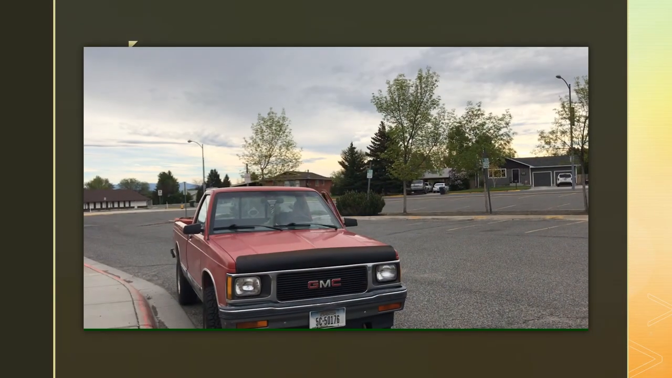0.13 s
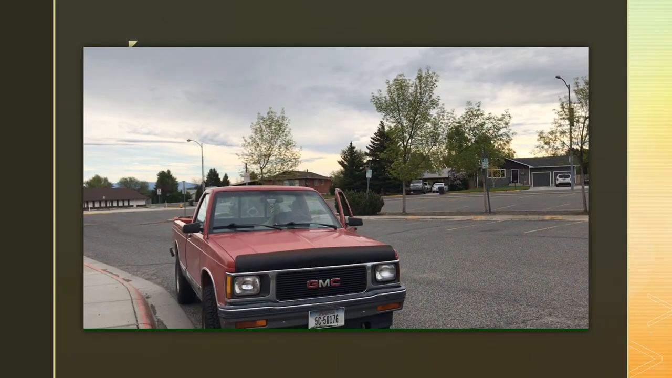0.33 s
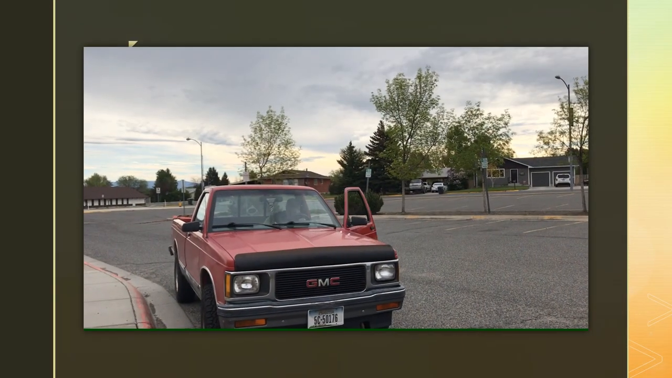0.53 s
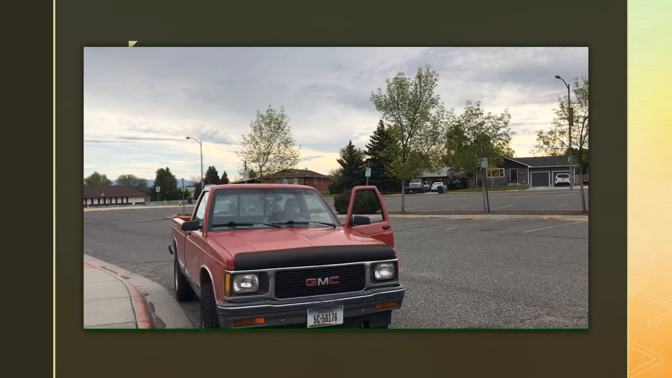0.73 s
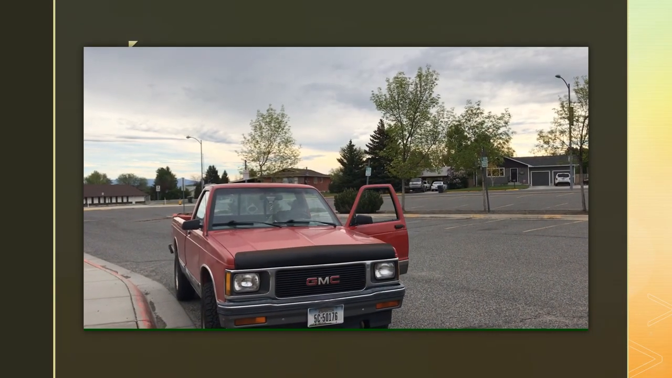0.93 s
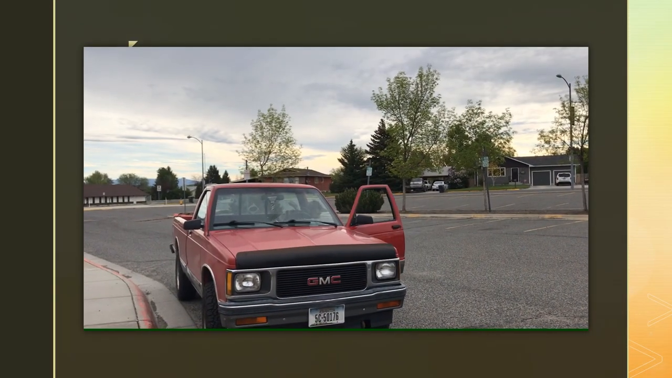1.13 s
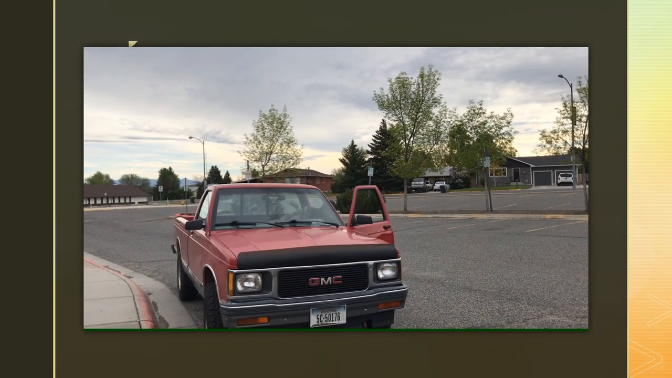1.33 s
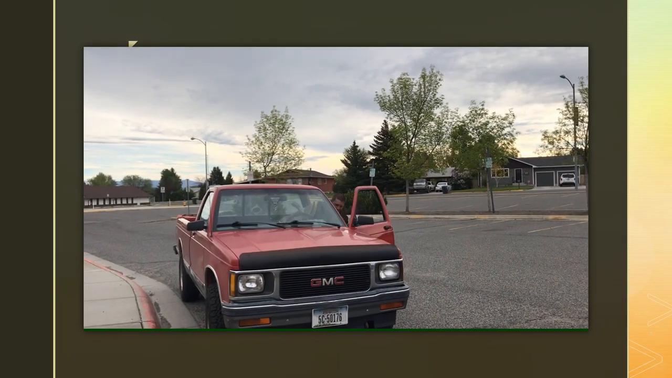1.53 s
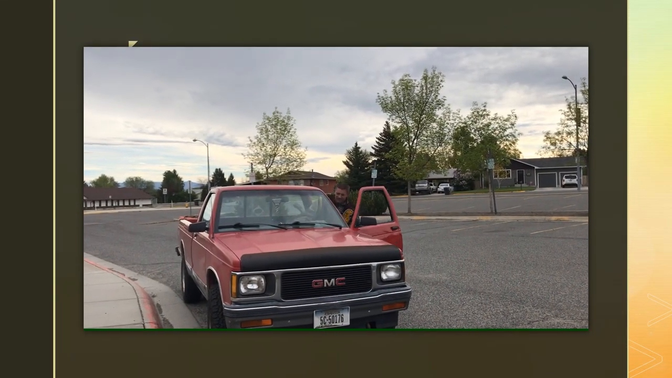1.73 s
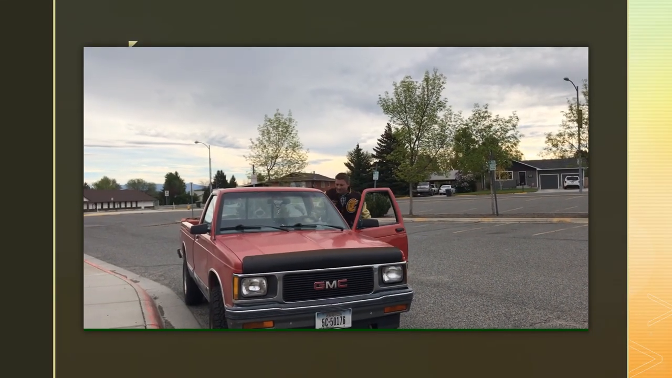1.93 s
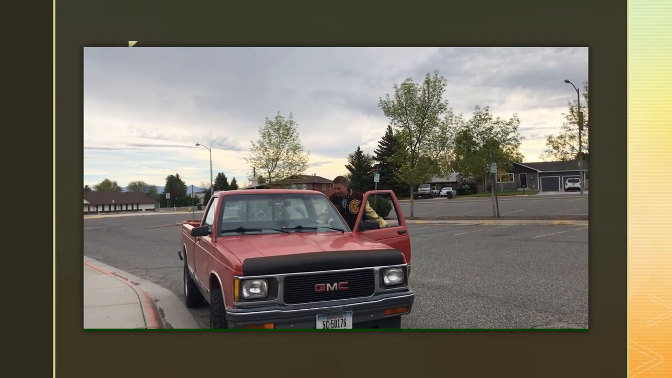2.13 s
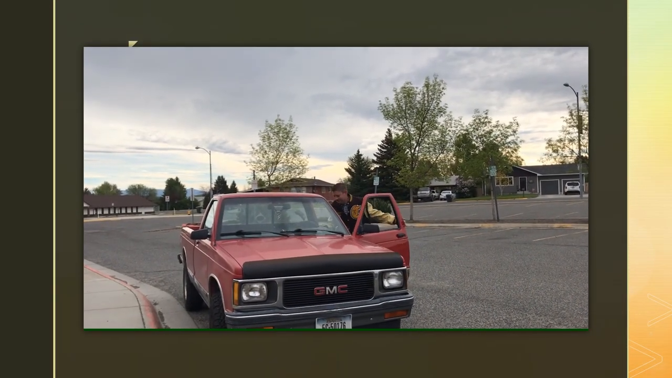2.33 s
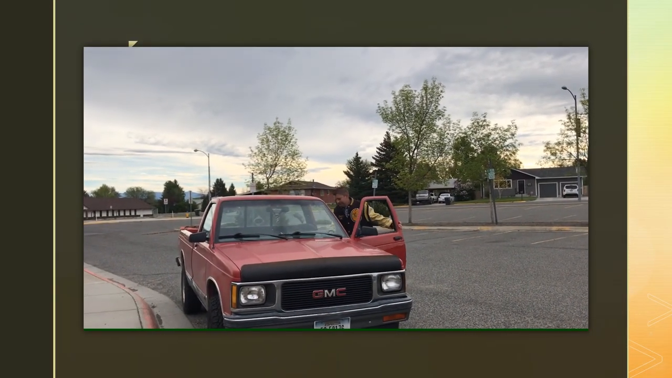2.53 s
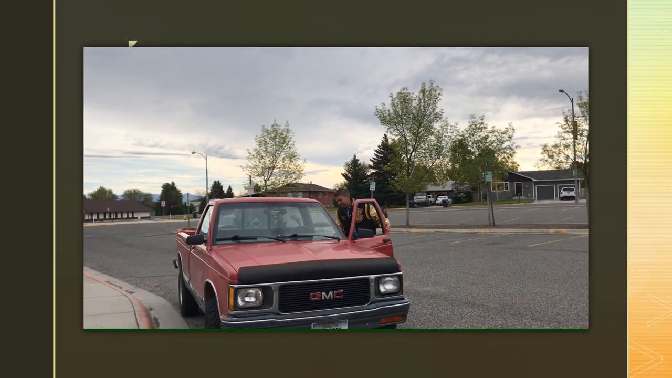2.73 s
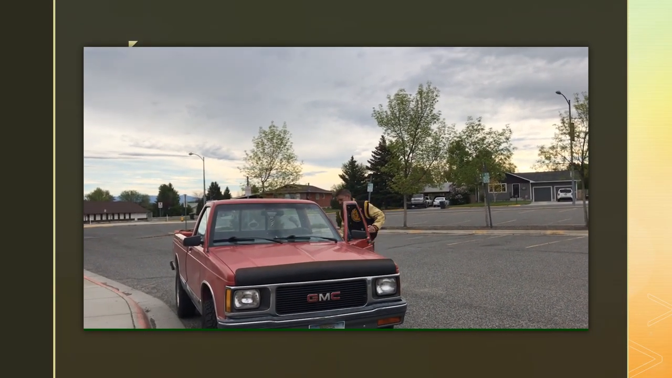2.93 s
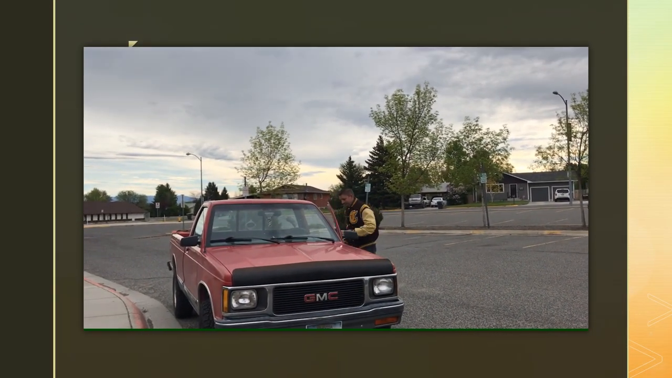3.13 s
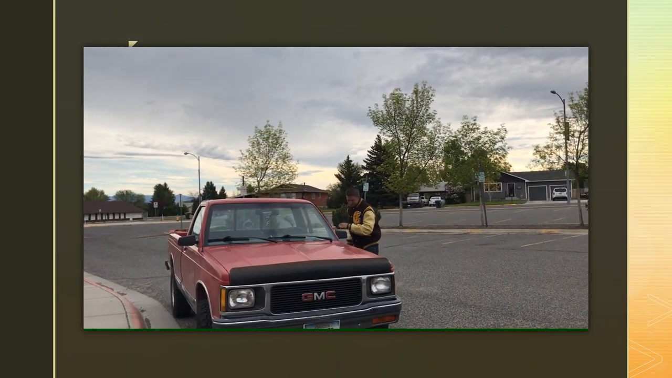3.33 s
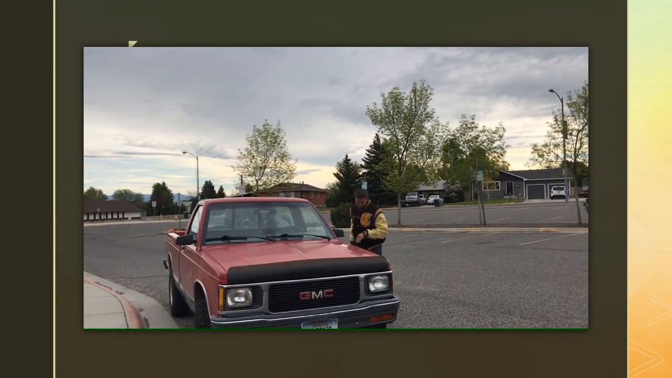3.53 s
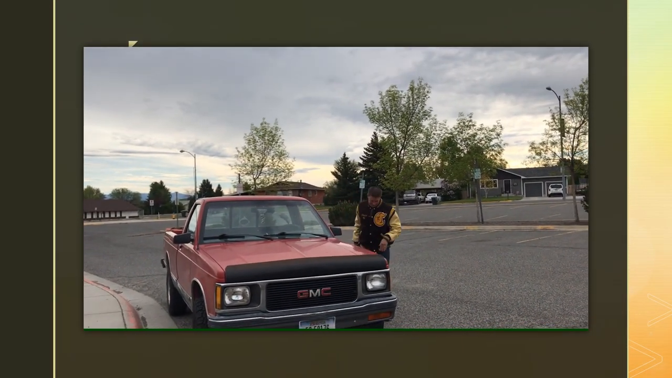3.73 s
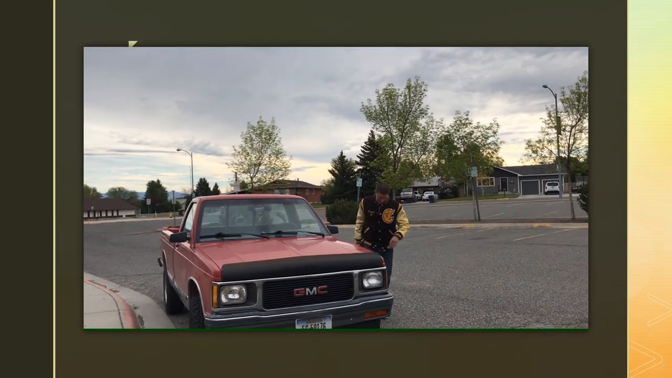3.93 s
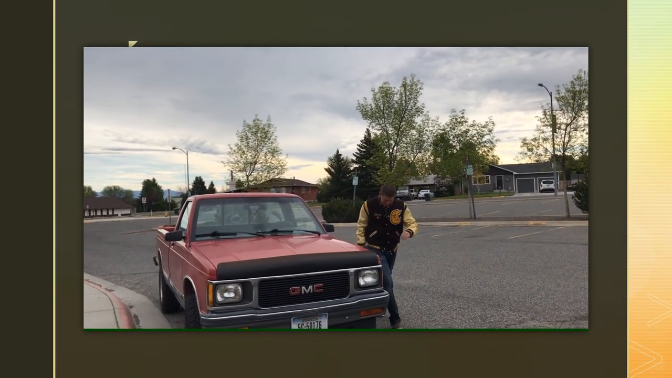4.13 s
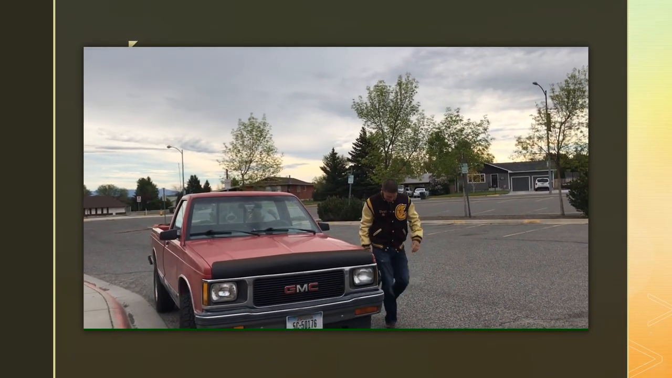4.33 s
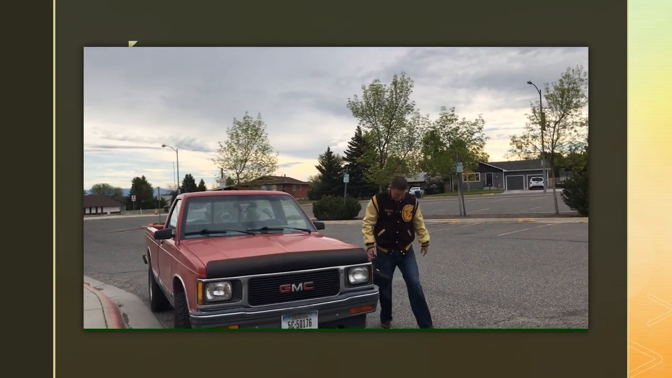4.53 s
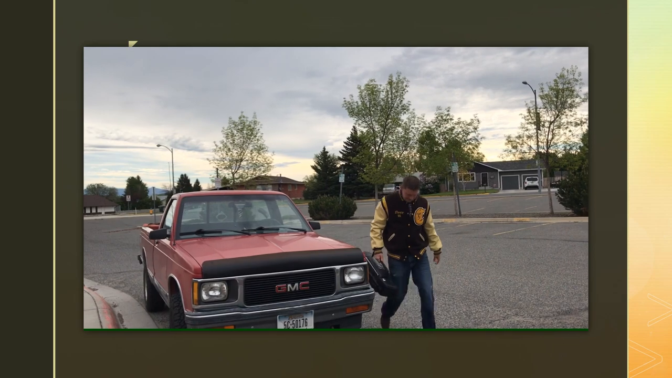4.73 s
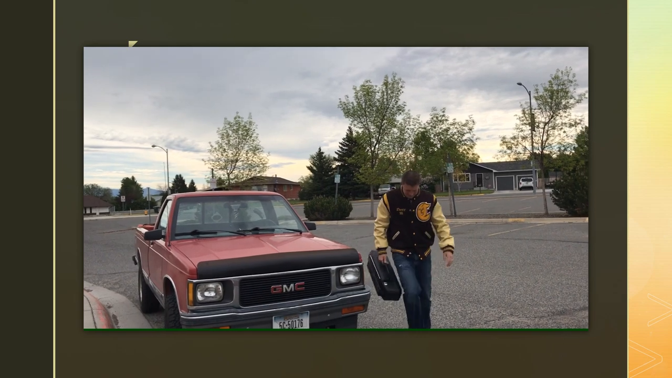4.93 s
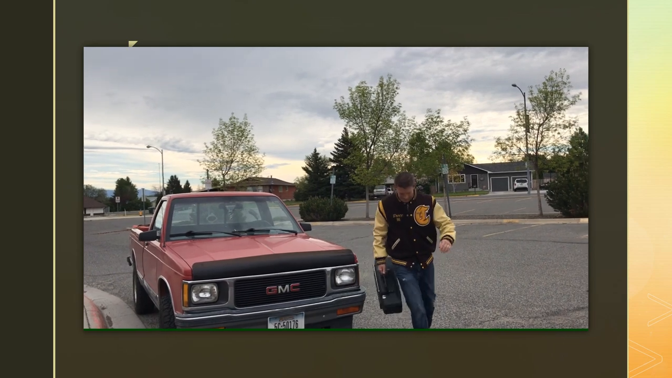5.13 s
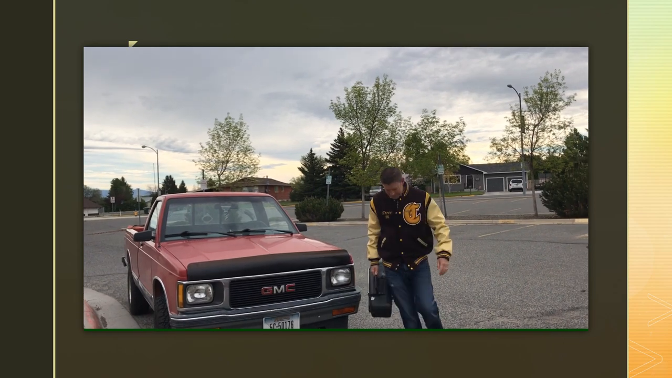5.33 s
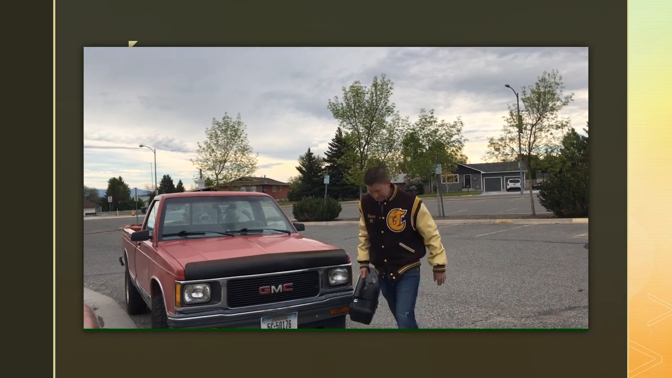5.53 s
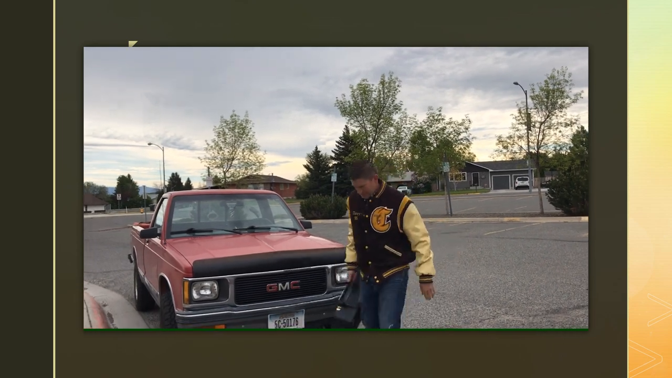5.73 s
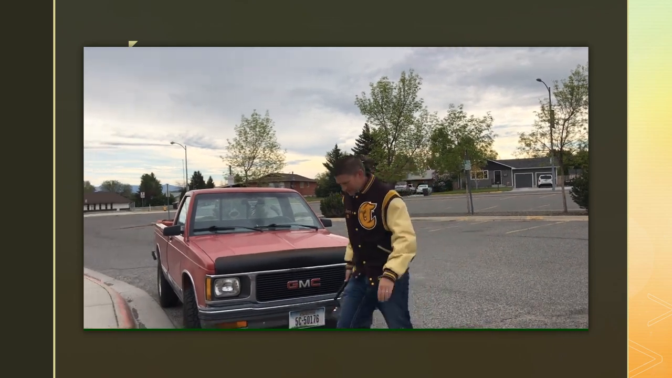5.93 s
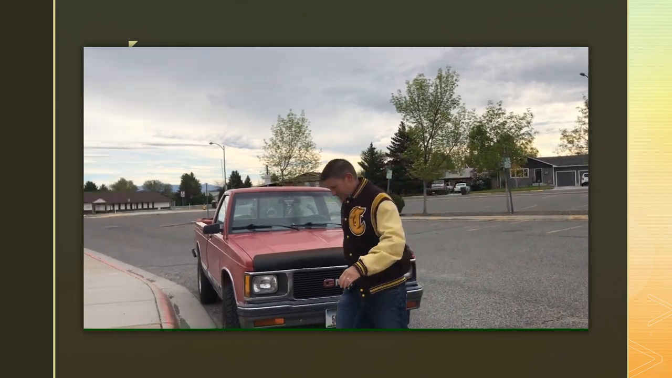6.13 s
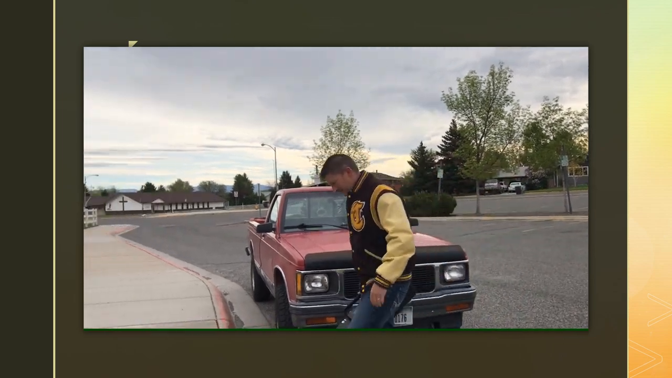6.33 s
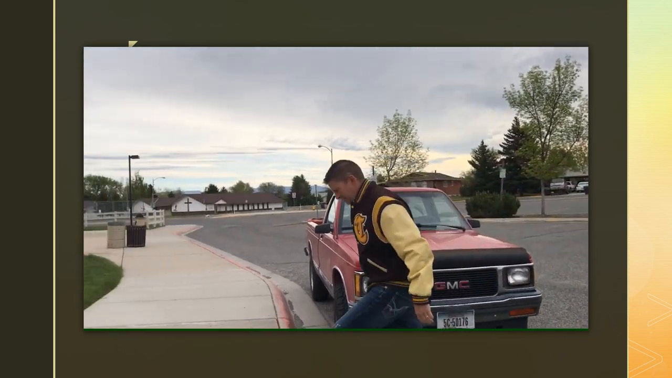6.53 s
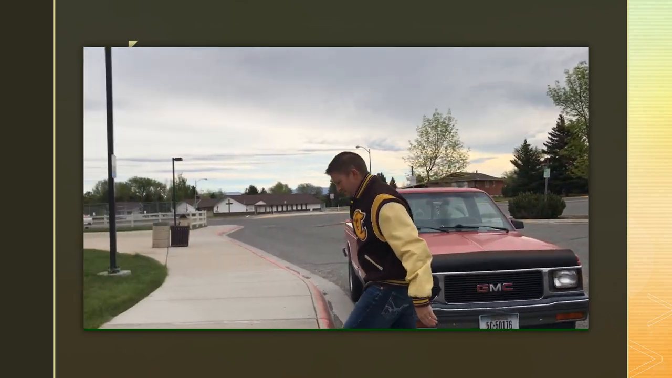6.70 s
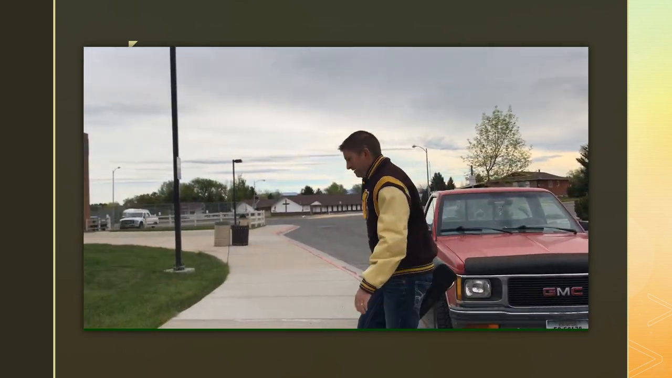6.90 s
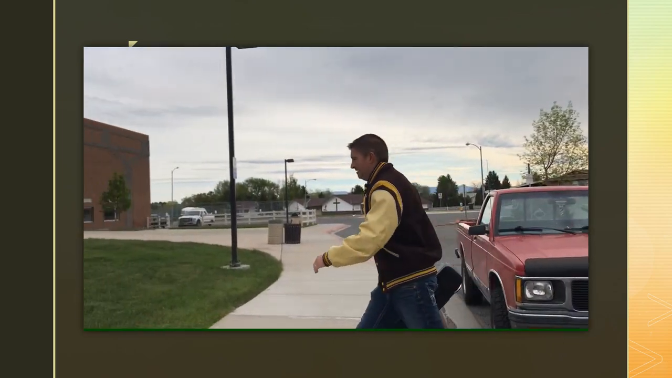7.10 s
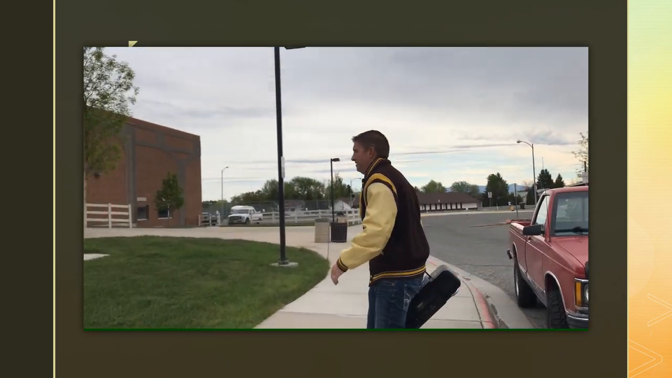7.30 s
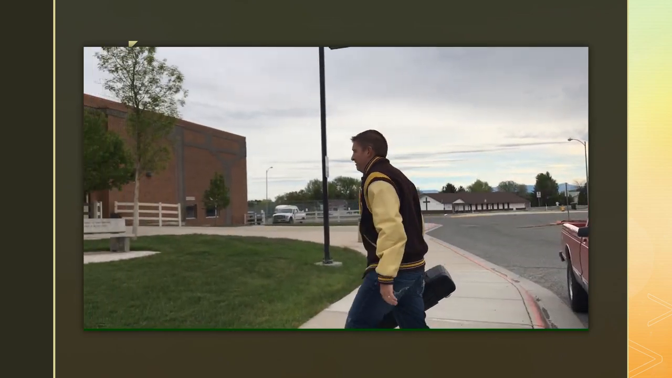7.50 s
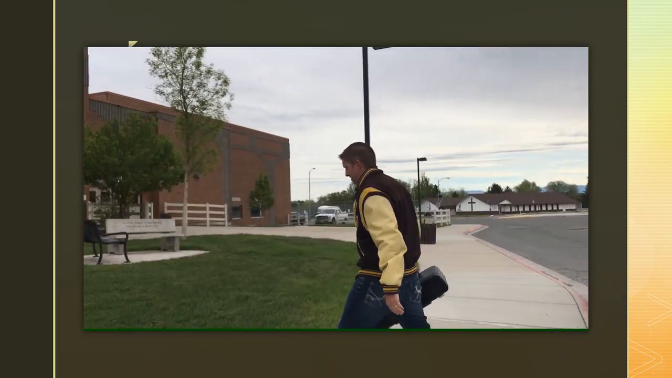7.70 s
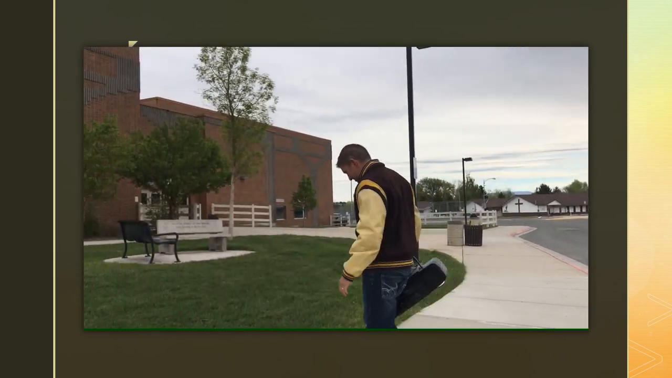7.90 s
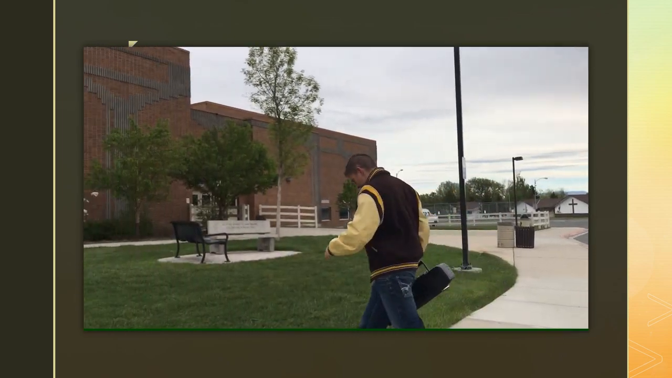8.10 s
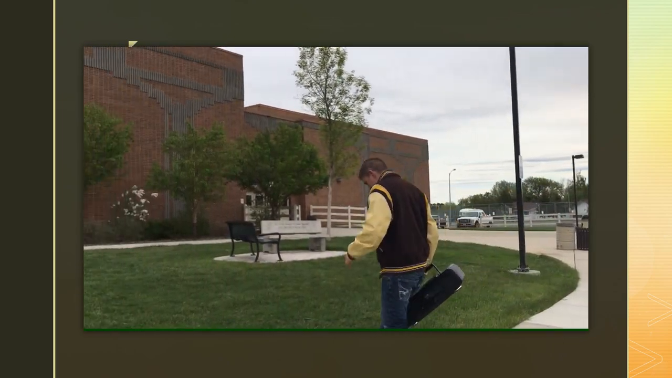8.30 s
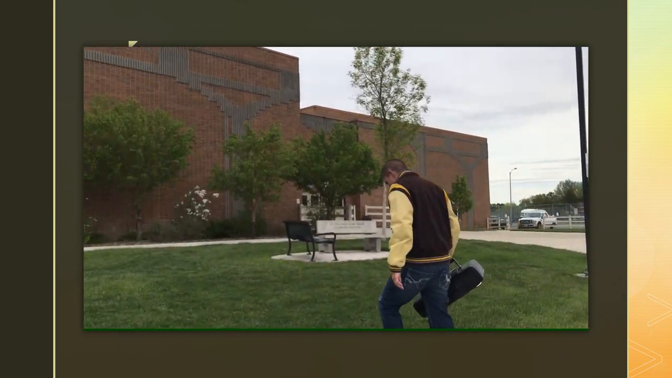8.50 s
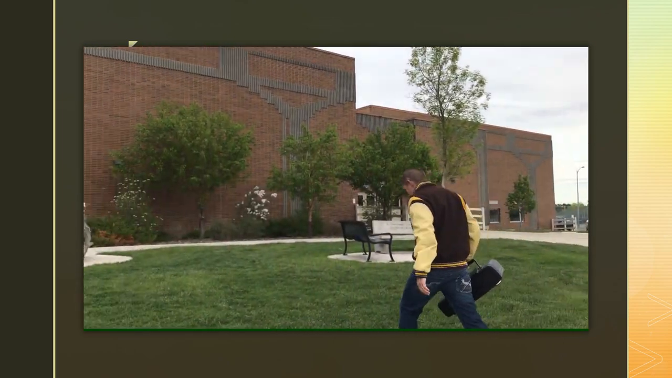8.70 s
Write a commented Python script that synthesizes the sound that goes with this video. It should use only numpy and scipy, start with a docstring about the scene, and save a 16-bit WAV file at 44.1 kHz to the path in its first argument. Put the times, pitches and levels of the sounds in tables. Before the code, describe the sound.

Faint bumps in a truck cab, one loud door slam, then quiet gritty footsteps moving onto grass over distant traffic and engine hum.

```python
"""An open parking lot, one microphone near a pickup. The driver climbs out and slams the door: latch and
frame strike, the steel panel clangs, the cab booms and houses throw the bang back. Footsteps pass
over gritty asphalt and onto a lawn, where blades hiss against the shoes. Further off an engine idles
under the rumble of far traffic, a songbird whistles faintly and a light breeze stirs the leaves."""
import sys
import numpy as np
from scipy import signal
from scipy.fft import rfft, irfft
from scipy.io import wavfile

SR = 44100
rng = np.random.default_rng(int(sys.argv[2]) if len(sys.argv) > 2 else 0)


def bounce(signal):
    """Save signal as a 16-bit WAV file at the path given by the first command-line argument."""
    frames = np.transpose(np.atleast_2d(signal))
    limited = np.clip(frames, -1, 1)
    pcm = np.round(limited * 32767).astype(np.int16)
    wavfile.write(sys.argv[1], SR, pcm)


N = 386139
T = np.arange(N) / SR
AGE = T[:SR]  # one second, counted from a sound's onset


def door():
    """Close by, each blow rings the panel and rattles the latch; the lot answers with duller returns."""
    # door meets latch and frame, then shudders: (time [s], ring [dB], clatter [dB], clatter t60 [s])
    blows = [(3.434, -44, -49, .05), (3.4568, -19, -29.5, 0.22), (3.4641, 0, -24, 0.033),
             (3.4688, -15.5, -20, 0.09), (3.478, -22, -30, 0.067), (3.49, -16, -43, 0.06),
             (3.502, -33, -34, 0.081), (3.55, -33, -55, 0.16), (3.571, -25, -48, 0.16)]
    # cab air, door skin and glass: (frequency [Hz], level [dB], t60 [s])
    modes = [(46.7, -24, 0.84), (65, -31.5, 0.56), (90.7, -22, 0.62), (111, -26.5, 0.6),
             (132.4, -10.5, 0.099), (156, -23, 0.16), (190, -26, 0.16), (226.7, -30, 0.31),
             (325.5, -29.5, 0.26), (351, -30, 0.29), (379, -25, 0.18), (447, -37, 0.15), (534, -26, 0.082),
             (704, -46, 0.11), (710, -33.5, 0.2), (819, -25, 0.1), (878, -34, 0.084), (950, -31, 0.078),
             (1056, -27.5, 0.08), (1247, -37, .09), (1282, -30, 0.11), (1504, -35.5, 0.16),
             (1995, -35.5, 0.14), (2150, -43, 0.088), (2780, -40, 0.14), (3550, -41, 0.061),
             (3960, -33, 0.059), (5130, -36, 0.049)]
    # latch, rods and crowded sheet-metal modes: (frequency [Hz], level [dB])
    clatter_spectrum = [(100, -15.5), (300, 7.5), (480, -7.5), (850, 1.5), (1300, -7), (1800, -7.5),
                        (3900, -10), (5200, -15), (7500, -19), (10500, -23.5), (13500, -21), (16000, -29)]
    # returns from ground, cars and house fronts: (time [s], level [dB], t60 [s])
    returns = [(3.486, -34, 0.66), (3.546, -38.5, 0.32), (3.635, -42, 0.28)]
    # the bang scattered by the lot: (frequency [Hz], level [dB])
    echo_spectrum = [(60, 4), (200, 13.5), (450, 0.5), (800, -2.5), (1400, -12), (2800, -16), (4500, -21.5),
                     (8000, -35), (15000, -61)]
    panel = ring(modes, rise_cycles=0.77)
    body = place((s, amp(db) * panel) for s, db, _, _ in blows)
    clatter = place((s, amp(db) * fade(t60, rise=0.0016) * noise(clatter_spectrum, SR))
                    for s, _, db, t60 in blows)
    echo = place((s, amp(db) * fade(t60, rise=0.0073) * noise(echo_spectrum, SR))
                 for s, db, t60 in returns)
    # loose parts chatter and reflections arrive in clumps
    return body + (clatter + echo) * amp(1.5 * drift(350))


def walking():
    """The driver walks past the microphone: footfalls, one hard heel clack, stones large and small."""
    # footfalls: (time [s], heel-to-sole lag [s], heel thud [dB], sole thud [dB], thud pitch [Hz],
    # heel scrape [dB], sole scrape [dB], heel scrape centre [Hz])
    footfalls = [(4.152, .066, -53, -56, 327, -59, -59, 1210), (4.658, 0.07, -63, -49, 300, -51, -56, 1665),
                 (5.133, 0.063, -47, -48, 314, -53.5, -53.5, 1340),
                 (5.626, 0.066, -43.5, -56, 300, -52.5, -56, 1300),
                 (6.131, .068, -37.5, -60, 145, -54.5, -59.5, 1000),
                 (6.632, .054, -33.5, -34.5, 222, -58.5, -57.5, 1570),
                 (7.166, 0.062, -42, -55, 269, -62, -61, 1220),
                 (7.703, 0.063, -42, -43, 120, -60.5, -63, 1110),
                 (8.184, 0.067, -47, -53, 280, -59.5, -63, 1510)]
    # a hard heel's contacts with the asphalt: (time [s], level [dB])
    heel_contacts = [(4.661, -21), (4.668, -6), (4.6718, 0), (4.6747, -2), (4.6794, -13)]
    # larger stones snapping underfoot: (time [s], level [dB], pitch [Hz], crack against note [dB])
    grit = [(4.18, -45, 1430, -26), (4.211, -46, 1880, -5.5), (4.7026, -34.5, 2800, -19),
            (4.767, -44, 1950, -12), (4.7757, -34.5, 1710, -10), (5.012, -46, 1630, -14),
            (5.123, -35, 3000, -22), (5.152, -37, 2030, -8), (5.1915, -41, 3140, -15),
            (5.489, -43.5, 2260, -9), (5.523, -36.5, 2390, -13), (5.552, -38.5, 2700, -32),
            (5.653, -36.5, 1350, -24), (5.7018, -29, 2670, -12), (5.883, -42.5, 1180, -15),
            (6.145, -38.5, 980, -31), (6.613, -37, 2900, -9), (6.630, -37.5, 2140, -14),
            (6.657, -43, 3700, -16), (7.012, -48.5, 2220, -21), (7.167, -45.5, 1370, -13),
            (7.456, -45, 1630, -19), (7.685, -42, 3060, -17), (8.384, -39, 2740, -30)]
    steps = place(part for step in footfalls for part in footfall(*step))
    heel = place((s, amp(db) * heel_clack()) for s, db in heel_contacts)
    stones = place((s, amp(db) * snap(hz, crack_db)) for s, db, hz, crack_db in grit)
    first, last = footfalls[0][0], footfalls[-1][0]
    stray_grains = place(crunch(first, last - first, db=-49.5, count=40))
    return steps + heel + stones + stray_grains


def footfall(s, sole_lag, heel_db, sole_db, thud_hz, heel_scrape_db, sole_scrape_db, scrape_hz):
    """Heel, then sole: each thuds and scrapes while grit crunches. Yields (time, sound) pairs."""
    yield s, amp(heel_scrape_db + 10) * snap(scrape_hz, crack_db=-11.5)  # the shoe ticks as it lands
    yield s, amp(heel_db) * thud(thud_hz, t60=0.034)
    yield s + sole_lag, amp(sole_db) * thud(thud_hz, t60=0.028)
    # (lag [s], half length [s], level [dB], centre [Hz])
    rubs = [(0.025, 0.012, heel_scrape_db, scrape_hz),  # the heel settles
            (sole_lag, 0.018, sole_scrape_db, 1.2 * scrape_hz),  # the sole rolls down, brighter
            (0.25, 0.035, -70.5, 1500)]  # clothes brush as the other leg swings through
    for lag, half, db, hz in rubs:
        yield s + lag - 3 * half, amp(db) * scuff(half, hz, q=0.52, grain_db=7.5, hiss_db=-34)
    yield from crunch(s, length=0.14, db=sole_scrape_db + 6.5, count=8)


def heel_clack():
    """A hard heel hits the asphalt: a hollow clack, a rasp and a crack in the treble."""
    # the clack's hollow colour, quickly fading peaks: (frequency [Hz], level [dB], t60 [s])
    peaks = [(265, -45, 0.038), (342, -34, 0.028), (962, -29, 0.04), (1670, -25.5, 0.017),
             (2180, -27.5, .022), (3000, -44, 0.023), (4460, -51, .012)]
    hollow = ring(peaks, rise_cycles=0.08)
    rasp = knock(2130, q=0.78, t60=0.014, tail_db=-28, tail_t60=0.25)
    crack = knock(8000, q=0.4, t60=0.013, tail_db=-18, tail_t60=0.12)
    return amp(-3) * hollow + amp(-24.5) * rasp + amp(-39) * crack


def crunch(start, length, db, count):
    """Small stones of random size and pitch snap at random moments. Yields (time, sound) pairs."""
    centre_hz, range_octaves, range_db = 2420, 1.3, 7
    for when, size, pitch in rng.random((count, 3)):
        hz = centre_hz * 2 ** (range_octaves * (pitch - 0.5))
        yield start + when * length, amp(db + range_db * (size - 1.5)) * snap(hz, crack_db=-5)


def snap(hz, crack_db):
    """A stone slips: a brief note under a bright crack."""
    note = knock(hz, q=1.5, t60=0.0068, tail_db=-15, tail_t60=0.068)
    crack = knock(4600, q=0.53, t60=0.0094, tail_db=-8, tail_t60=0.046)
    return note + amp(crack_db) * crack


def climbing_out():
    """The driver bumps the cab and slides off the seat; the door seal rubs just before the slam."""
    # dull knocks in the cab: (time [s], level [dB], pitch [Hz])
    bumps = [(0.946, -46, 455), (1.20, -47, 400), (1.332, -42.5, 293), (1.591, -45, 257), (1.612, -53, 330),
             (2.12, -37, 105), (2.17, -37.5, 89), (2.395, -44, 320), (2.540, -42, 259), (3.162, -48.5, 434)]
    # seat, jacket and door seal, then a swinging foot scuffing after the slam: (peak time [s], half length [s],
    # level [dB], centre [Hz], Q)
    rubs = [(.946, 0.009, -61.5, 1890, 0.54), (1.383, 0.031, -64.5, 1380, 0.45),
            (1.803, 0.0062, -59, 2380, 0.66), (1.904, .1, -70, 2200, 3.7), (2.081, .05, -56.5, 2250, 0.46),
            (2.084, 0.016, -50, 2710, 1.45), (3.445, 0.0052, -46.5, 1510, .9),
            (3.908, 0.015, -62.5, 1400, 0.55)]
    thuds = place((s, amp(db) * thud(hz, t60=0.039)) for s, db, hz in bumps)
    scuffs = place((s - 3 * half, amp(db) * scuff(half, hz, q, grain_db=5.5, hiss_db=-26.5))
                   for s, half, db, hz, q in rubs)
    return thuds + scuffs


def thud(hz, t60):
    """A soft weight lands: a damped swing and a little rumble."""
    rumble = knock(hz, q=0.68, t60=0.08, tail_db=-13, tail_t60=0.29)
    return ring([(hz, 0, t60)], rise_cycles=0.03) + amp(-4.5) * rumble


def knock(hz, q, t60, tail_db, tail_t60):
    """A short rough contact and its faint scatter through a steep resonance; peak 1."""
    envelope = fade(t60, rise=0.0001) + amp(tail_db) * fade(tail_t60, rise=0.0015)
    contact = rng.standard_normal(SR) * envelope
    sound = resonate(resonate(contact, hz, q), hz, q)
    return sound / np.abs(sound).max()


def scuff(half, hz, q, grain_db, hiss_db):
    """Rubbing: a swell of tiny slips of very uneven size, peaking three half lengths in."""
    t = np.arange(int(6 * half * SR)) / SR - 3 * half
    slips = rng.standard_normal(len(t))
    slips *= amp(grain_db * np.minimum(rng.exponential(size=len(t)), 5))
    rasp = resonate(resonate(slips, hz, q), hz, q) + amp(hiss_db) * slips
    return unit(rasp) * np.exp(-(t / half) ** 2 / 2)


def grass():
    """On the lawn, blades hiss and crackle against each shoe until it lifts clear."""
    # shoes brushing through grass: (time [s], length [s], level [dB])
    strokes = [(6.589, 0.062, -62), (7.164, 0.073, -65.5), (7.671, 0.0075, -53.5), (7.713, 0.045, -67),
               (8.15, .12, -60.5), (8.474, 0.25, -52.5)]
    # hiss of the blades: (frequency [Hz], level [dB])
    spectrum = [(400, 4.5), (1500, -3), (3500, 4.5), (6000, 2), (8000, -2), (9200, 1.5), (10500, -3),
                (13000, 7), (16000, 0)]
    swishes = []
    for s, length, db in strokes:
        release = np.exp(-np.maximum(AGE - length, 0) / 0.022)
        swishes.append((s, amp(db) * fade(t60=1.5, rise=0.009) * release * noise(spectrum, SR)))
    crackle = amp(2.7 * drift(250) + 2.1 * drift(35))
    return place(swishes) * crackle


def bird():
    """A far songbird's fluttering notes reach the microphone directly and smeared by the trees."""
    # the song: (time [s], syllable, length [s], relative level [dB], middle pitch [Hz])
    notes = [(4.956, "slur", .034, -62.5, 3620), (5.078, "slur", .034, -60.5, 3720),
             (5.312, "arch", 0.048, -58, 3500), (5.442, "hook", .034, -62, 3850),
             (5.578, "arch", 0.053, -55, 3490), (5.722, "slur", 0.046, -59, 3970),
             (5.805, "arch", .034, -67, 5130), (5.842, "slur", 0.044, -55.5, 3720),
             (5.887, "dive", .036, -61, 3250), (6.016, "arch", 0.061, -67, 4590),
             (6.07, "dive", .042, -57, 3700), (6.117, "arch", .055, -54.5, 3570),
             (6.218, "hook", .05, -62, 3490), (6.326, "arch", .042, -63, 3430),
             (6.435, "hook", 0.04, -58, 3550), (6.549, "dive", .045, -61, 3200),
             (6.785, "hook", 0.055, -63, 3670), (7.113, "slur", 0.068, -60.5, 3830)]
    # pitch bend of each syllable: (start [share of middle pitch], end [share of middle pitch])
    bends = {"arch": (.93, 0.9), "hook": (.90, 0.74), "slur": (1.11, .93), "dive": (1.17, 0.82)}
    song = place((s, amp(db) * whistle(length, hz, *bends[kind])) for s, kind, length, db, hz in notes)
    song *= amp(3 * drift(180))  # flutter
    trees = rng.standard_normal(SR) * fade(t60=0.12, rise=0.003)
    scattered = signal.fftconvolve(song, trees / np.linalg.norm(trees))[:N]
    return amp(-4) * song + amp(-12.5) * scattered


def whistle(length, middle_hz, start, end):
    """A pure note bends through three pitches, with soft ends."""
    progress = np.linspace(0, 1, int(length * SR))
    parabola = np.polyfit([0, 0.5, 1], [start, 1, end], 2)
    hz = middle_hz * np.polyval(parabola, progress)
    return np.sin(2 * np.pi * np.cumsum(hz) / SR) * signal.windows.tukey(len(hz), 0.45)


def idling_engine():
    """An engine hums somewhere off the microphone, its firing rate and partials wavering."""
    # partials of the idle: (multiple of the firing rate, relative level [dB])
    partials = [(1, -52.5), (2, -55.5), (2.5, -64.5), (3, -67.5), (4, -69.5), (7, -80)]
    firing_hz, waver_db = 56.33, 3.14
    firings = np.cumsum(firing_hz * (1 + 0.005 * drift(3))) / SR
    hum = np.zeros(N)
    for multiple, db in partials:
        rms = amp(db + waver_db * drift(7))
        hum += np.sqrt(2) * rms * np.sin(2 * np.pi * (multiple * firings + rng.random()))
    return hum


def traffic():
    """Far roads rumble, coloured by a faint narrow band of noise near 1 kHz."""
    # traffic at a distance: (frequency [Hz], level [dB])
    spectrum = [(20, -45), (35, -5), (48, -2.5), (70, 3.5), (105, 1.5), (150, -4), (200, -10), (280, -16.5),
                (380, -18), (500, -24.5), (750, -27), (1000, -29.5), (2400, -32), (6000, -49.5)]
    rumble = amp(-50 + 0.57 * drift(4.1)) * noise(spectrum, N)
    narrow_band = amp(-75 + 1.4 * drift(1.94)) * unit(resonate(noise(spectrum, N), hz=983, q=12.5))
    return rumble + narrow_band


def breeze():
    """Leaves and grass around the lot hiss in a slowly rising breeze."""
    # airy hiss: (frequency [Hz], level [dB])
    spectrum = [(500, 4), (2000, -0.5), (4200, -5), (6000, -7.5), (7700, -16), (9200, -13), (10400, -22.5),
                (12000, -9), (13500, -12.5), (16000, -17.5)]
    # strength of the breeze: (time [s], relative level [dB])
    strength = [(0, -71), (3, -72), (5.5, -65), (7.3, -64.5), (8.76, -61.5)]
    level_db = np.interp(T, *np.transpose(strength)) + 0.23 * drift(4)
    return amp(level_db) * noise(spectrum, N)


def amp(db):
    """Decibels to gain."""
    return 10 ** (np.asarray(db) / 20)


def unit(x):
    """Scale to rms 1."""
    return x / np.sqrt(np.mean(x ** 2))


def noise(spectrum, size):
    """Noise of rms 1, shaped by (frequency [Hz], level [dB]) rows."""
    hz, db = np.transpose(spectrum)
    bin_hz = np.fft.rfftfreq(size, 1 / SR)
    gain = amp(np.interp(np.log(bin_hz + 1), np.log(hz), db))
    return unit(irfft(rfft(rng.standard_normal(size)) * gain, size))


def resonate(x, hz, q):
    """One two-pole resonance."""
    return signal.lfilter(*signal.iirpeak(hz, q, fs=SR), x)


def fade(t60, rise):
    """A one-second envelope that rises and decays exponentially; both times in seconds."""
    return (1 - np.exp(-AGE / rise)) * np.exp(-np.log(1000) * AGE / t60)


def ring(tones, rise_cycles):
    """Decaying tones; each takes a share of its own cycle to build up."""
    return sum(amp(db) * fade(t60, rise_cycles / hz) * np.sin(2 * np.pi * hz * AGE)
               for hz, db, t60 in tones)


def drift(rate):
    """Random drift with a spread near 1, through `rate` new values a second."""
    knots = rng.standard_normal(int(N / SR * rate) + 2)
    return np.interp(T * rate, np.arange(len(knots)), knots)


def place(sounds):
    """Mix (time [s], sound) pairs into one track."""
    out = np.zeros(N + 2 * SR)
    for s, sound in sounds:
        start = max(int(s * SR), 0)
        out[start:start + len(sound)] += sound
    return out[:N]


def scene():
    """The lot, near and far, at one microphone."""
    slam = door()
    background = amp(-1) * (idling_engine() + traffic() + breeze()) + bird()
    return (slam + background + climbing_out() + grass() + walking())[None]


def record(dry):
    """The sound opens after a brief silence; the deepest bass and the top are cut."""
    opened = dry * np.interp(T, [0.075, 0.088], [amp(-55.5), 1])
    low_cut = signal.butter(4, 32, "high", fs=SR, output="sos")
    high_cut = signal.ellip(10, 0.2, 70, 15800, fs=SR, output="sos")
    return signal.sosfilt(high_cut, signal.sosfilt(low_cut, opened))


dry = scene()
out = record(dry)
bounce(out)
```